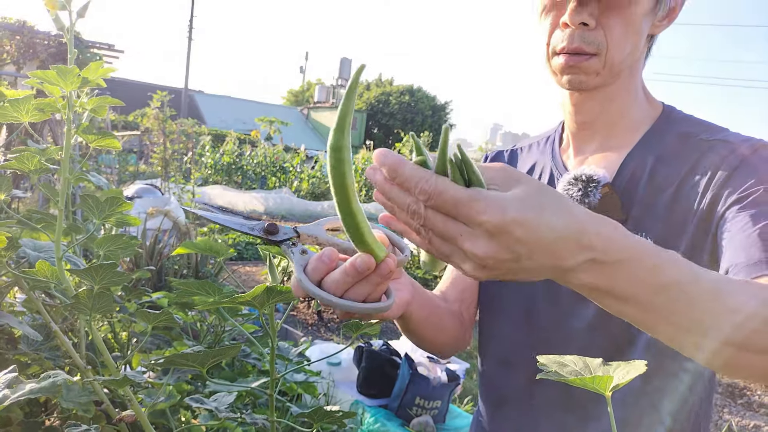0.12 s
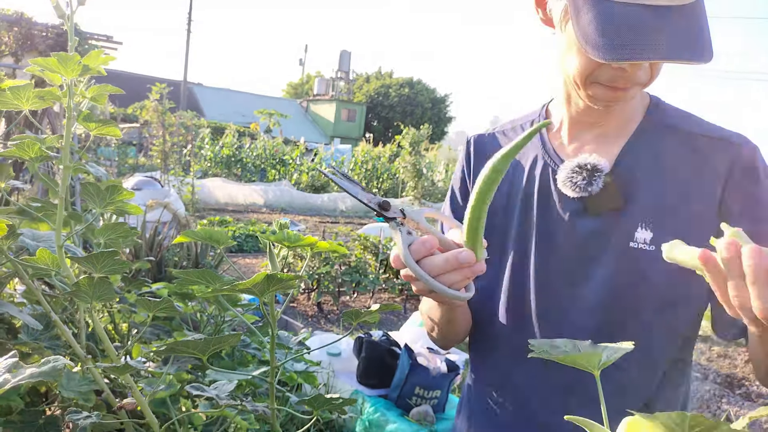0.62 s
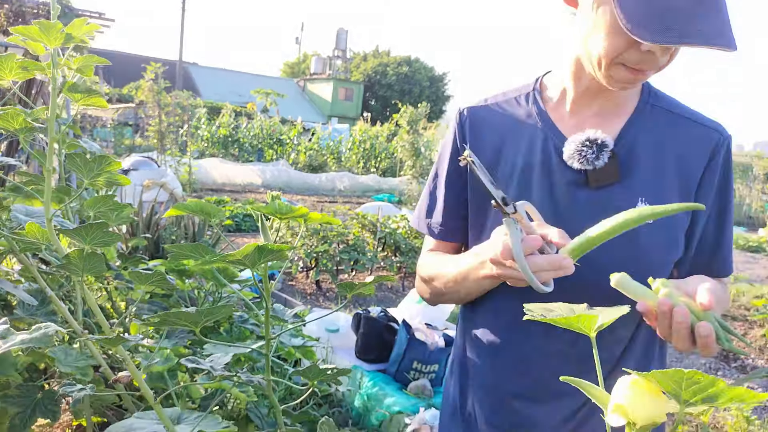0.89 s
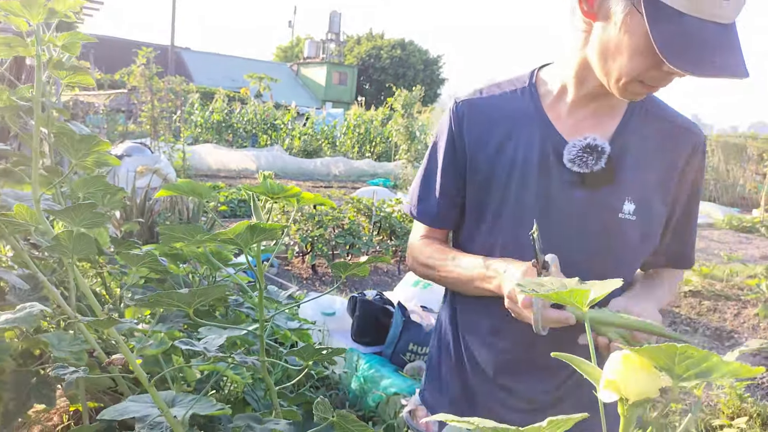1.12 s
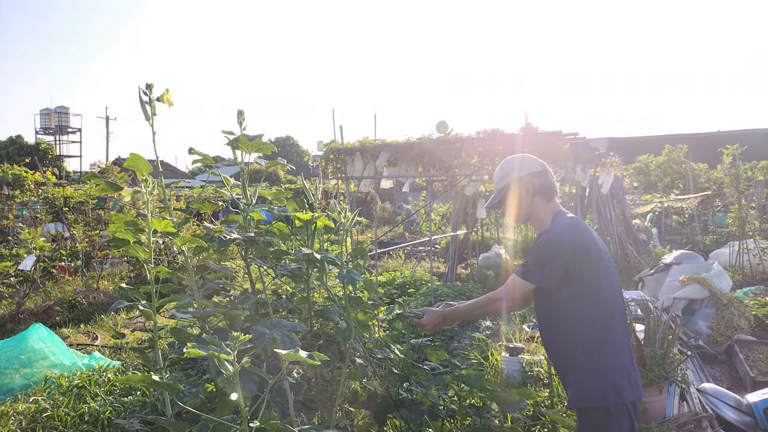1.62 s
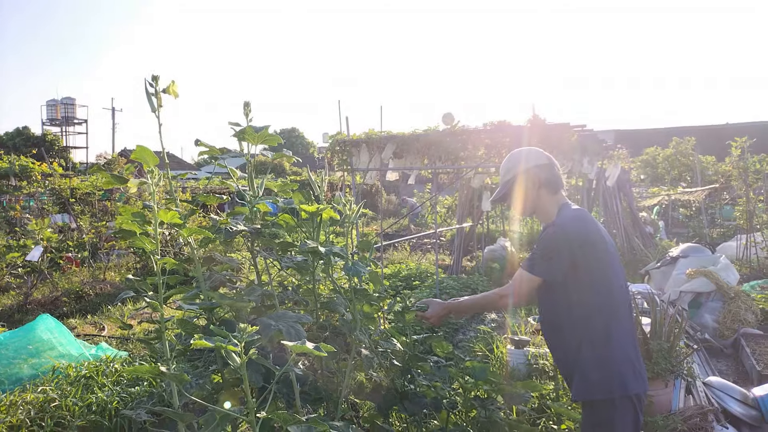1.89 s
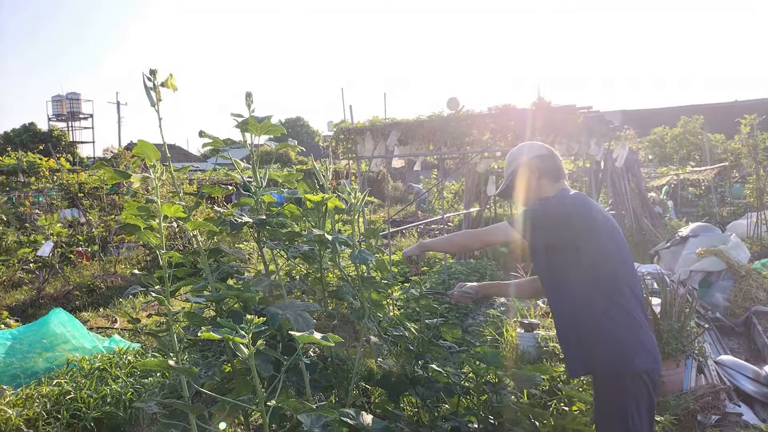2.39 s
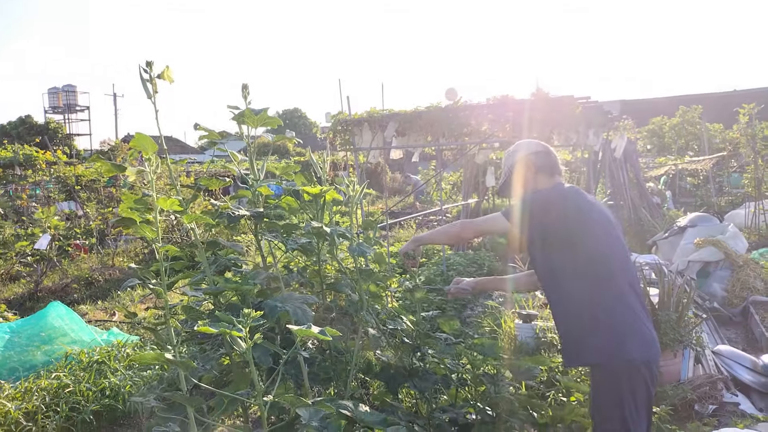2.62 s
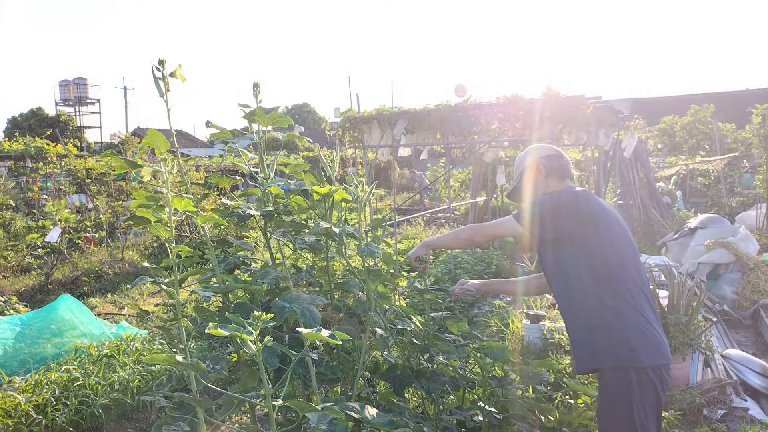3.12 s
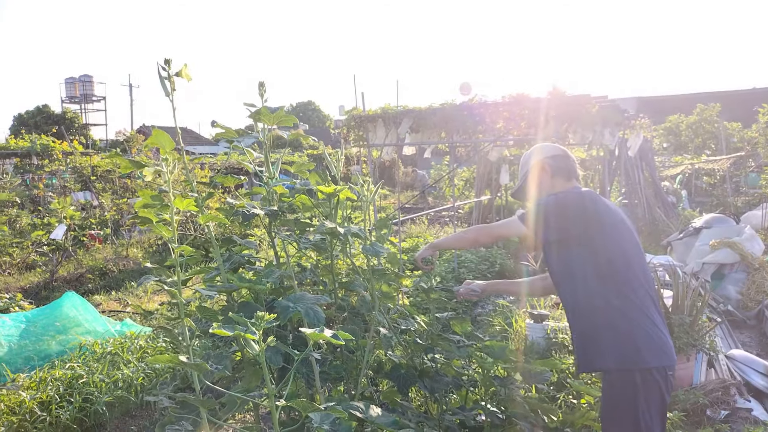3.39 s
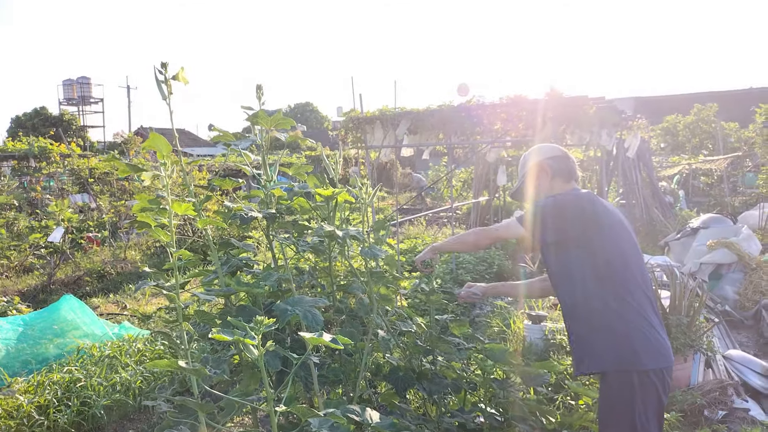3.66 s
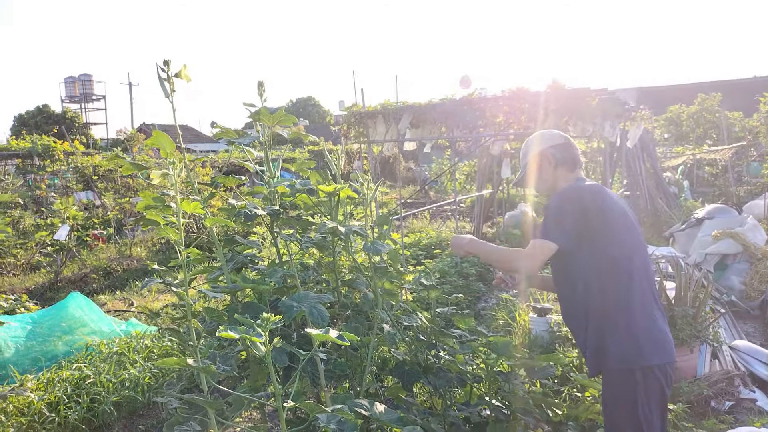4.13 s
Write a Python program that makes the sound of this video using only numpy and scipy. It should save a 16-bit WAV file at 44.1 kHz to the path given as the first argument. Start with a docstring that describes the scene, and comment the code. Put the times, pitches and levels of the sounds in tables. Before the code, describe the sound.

Two sharp metallic scissor snips cut tough stems close by in a garden while small birds twitter and a cricket chirps over faint traffic.

```python
"""Garden scissors cut two tough stalks close by: filtered noise bursts make fibres tick and blades snap,
with decaying sines for the ring of the steel and the grip. Soft knocks are short damped sines.
Small birds are gliding, trilling sines in scattered echoes; a cricket, bush insects, a far cricket chorus
and a far dove are shaped tones of unsteady pitch. Traffic hum, steady leaf hiss and a late cloth rustle
are coloured noise."""
import sys
import numpy as np
from scipy import signal
from scipy.fft import rfft, irfft, next_fast_len
from scipy.io import wavfile
from scipy.ndimage import uniform_filter1d, map_coordinates

SR = 44100
rng = np.random.default_rng(int(sys.argv[2]) if len(sys.argv) > 2 else 0)


def voltage_ratio(decibels):
    """Convert decibels (scalar or array-like) to amplitude ratios, 20 dB per decade."""
    exponent = np.asarray(decibels, float) / 20
    return 10 ** exponent


def master_out(mix):
    """Clip the mix to full scale and print it as 16-bit PCM to the path in sys.argv[1]."""
    frames = np.transpose(np.atleast_2d(mix))
    ceiling = np.clip(frames, -1, 1)
    pcm = np.round(ceiling * 32767).astype(np.int16)
    wavfile.write(sys.argv[1], SR, pcm)


N = 254809  # length in samples

# traffic and leaves over time: [t/s, traffic level/dB, leaves level/dB before a trim]
AIR_LEVELS = [(0, -48.5, -62), (1.33, -50, -64.5), (1.36, -52.5, -64.5), (3.9, -53, -64.5),
              (4.3, -54, -66.5), (5.3, -51.5, -60.5), (5.78, -46, -60.5)]
# spectrum of the far traffic: [f/Hz, relative level/dB]
TRAFFIC_SPECTRUM = [(13, -37.5), (22, -24.5), (64, -1), (118, 0.5), (251, -2.5), (544, -7.5), (825, -6),
                    (1280, -17.5), (2500, -28.5), (3250, -66), (5500, -120)]
# spectrum of the leaves: [f/Hz, relative level/dB]
LEAF_SPECTRUM = [(710, -27), (1200, -3.5), (1740, -11.5), (2500, -9), (3700, -13), (4440, -7),
                 (5720, -14.5), (6500, -13), (8310, -9), (10300, -13.5), (11000, -19.5), (11400, -41.5),
                 (13500, -44), (16000, -65.5)]
# scattering among stalks, leaves and sheds: [f/Hz, time to fall 60 dB/s]
GARDEN_DECAY = [(300, .04), (2500, .06), (5000, .14), (8000, .17), (12000, .12)]
# clear bird notes: [t/s, length/s, first f/Hz, last f/Hz, top level/dB]
WHISTLE_NOTES = [(0, 0.094, 3610, 3510, -53), (0.473, .03, 6100, 5100, -52.5),
                 (0.506, 0.026, 5200, 4090, -48), (0.516, 0.094, 4256, 4364, -43),
                 (0.624, 0.11, 3690, 3630, -61.5), (0.504, 0.041, 2310, 2050, -58.5),
                 (0.552, 0.044, 2190, 1760, -51), (.595, .04, 2270, 1600, -48),
                 (0.64, 0.041, 2210, 1690, -51), (0.746, 0.0457, 3260, 3200, -59),
                 (0.802, 0.029, 2900, 2500, -55.5), (0.832, 0.031, 3100, 3380, -49),
                 (.915, 0.037, 6700, 5660, -60), (1.34, 0.067, 5020, 5080, -51),
                 (1.343, 0.023, 3900, 4100, -50), (1.356, 0.021, 4500, 4680, -50),
                 (1.395, 0.026, 4530, 3310, -54.5), (1.368, 0.032, 3200, 3170, -59),
                 (1.413, 0.052, 3436, 2990, -44.5), (1.455, .022, 3050, 1940, -44.5),
                 (1.663, 0.025, 4900, 4880, -56), (1.714, 0.038, 4530, 4930, -47.5),
                 (2.265, 0.056, 5120, 3540, -57.5), (2.38, 0.021, 2280, 2360, -47.5),
                 (2.401, .02, 3040, 2890, -51.5), (2.426, 0.082, 2960, 3110, -43.5),
                 (2.479, 0.042, 6200, 6170, -71), (2.508, 0.025, 5050, 5060, -48),
                 (2.538, 0.026, 3420, 3390, -51.5), (2.564, 0.064, 3490, 3484, -40),
                 (2.583, .045, 7000, 6880, -52.5), (2.656, 0.025, 2800, 1990, -55),
                 (2.747, 0.046, 3500, 4030, -54), (2.743, 0.089, 5350, 6100, -55.5),
                 (2.825, 0.071, 2590, 2206, -54.5), (2.889, 0.1, 2240, 2140, -48),
                 (2.96, 0.047, 2250, 1795, -44.5), (2.998, 0.032, 3370, 2900, -61),
                 (3.031, 0.084, 2726, 2400, -47.5), (3.093, 0.033, 2473, 1780, -43),
                 (3.12, 0.062, 1777, 2370, -46.5), (3.36, 0.067, 2740, 2894, -52.5),
                 (3.528, 0.082, 1640, 1740, -58.5), (3.73, 0.019, 5850, 5950, -48),
                 (3.809, 0.11, 4240, 3940, -45), (3.896, 0.033, 4380, 1990, -46),
                 (3.924, 0.023, 1966, 1750, -52.5), (4.128, 0.032, 1913, 1860, -62),
                 (4.155, 0.027, 1515, 1580, -52.5), (4.191, 0.0388, 1714, 1680, -61.5),
                 (4.365, .022, 3910, 3850, -56), (4.386, 0.045, 2990, 2390, -59),
                 (4.454, .04, 3380, 3500, -58), (4.509, 0.056, 3350, 3660, -50.5),
                 (4.548, 0.024, 3300, 3080, -56), (4.527, 0.039, 1800, 1890, -52),
                 (4.65, .035, 3100, 3270, -56), (4.715, .03, 3380, 3370, -55),
                 (4.781, .04, 3050, 3100, -58.5), (4.833, 0.014, 2170, 2330, -48.5),
                 (4.852, 0.025, 2230, 2600, -47), (4.902, 0.045, 2490, 2230, -54),
                 (5.126, .025, 2500, 2250, -42.5), (5.148, 0.027, 2760, 2900, -48),
                 (1.115, 0.033, 1870, 1745, -63), (5.362, 0.04, 2794, 2910, -48.5),
                 (5.42, 0.029, 2952, 3100, -53), (5.482, .03, 2410, 2495, -47.5),
                 (5.501, 0.026, 3080, 3010, -42.5), (5.523, 0.033, 2860, 2740, -44),
                 (5.563, 0.038, 2920, 2586, -45.5), (5.57, 0.042, 2035, 1930, -48.5),
                 (5.603, 0.038, 2230, 2030, -41.5), (5.644, 0.039, 1966, 2150, -42.5),
                 (5.682, .03, 2073, 2100, -48)]
# guide level of the far flock: [t/s, level/dB]
FLOCK_LEVELS = [(0, -89), (.9, -57.5), (1.2, -77.5), (2.6, -72), (3.3, -72.5), (4, -73.5), (4.1, -58.5),
                (4.3, -71.5), (4.6, -56), (5.1, -64.5), (5.3, -72), (5.45, -55), (5.78, -62)]
# one row per insect source; the last, near 4450 Hz, is a far cricket chorus:
# [wing tones f/Hz, unsteadiness/Hz, stroke rate/Hz (0 = steady), stroke sharpness]
INSECT_WINGS = [((8800,), 50, 123.2, 1.1), ((7850, 7300), 70, 156, 1.3), ((9800, 9300), 70, 108, 1.3),
                ((6850,), 40, 0, 0), ((4450,), 90, 25, .8)]
# one list of bouts per insect source: [t/s, length/s, first level/dB, last level/dB]
INSECT_BOUTS = [
    [(1.345, 2.23, -66, -71.5), (3.53, 2.08, -78.5, -83.5)],
    [(3.5, 0.19, -69.5, -47), (3.86, .14, -64, -59), (4.14, 0.17, -67.5, -55.5), (4.46, 0.21, -66.5, -56),
     (4.84, 0.18, -69, -66)],
    [(5.221, 0.4, -64.5, -63.5)],
    [(1.1, 0.23, -74, -63), (2.63, 0.28, -70, -74), (4, 0.546, -74, -79)],
    [(0, 1.17, -70, -71), (1.28, 1.3, -70.5, -77.5), (2.19, 0.21, -66, -69), (2.4, 0.94, -78, -74),
     (3.22, 0.85, -75, -66), (4.13, 0.72, -89, -85), (4.92, 0.24, -62.5, -56), (5.33, .5, -86, -67)],
]
# bouts of cricket chirps: [first t/s, last t/s, last chirp's level/dB before scatter, f/Hz]
CRICKET_BOUTS = [(.059, 0.287, -31, 4445), (0.396, .46, -51, 4560), (.754, 0.991, -32.5, 4237),
                 (1.213, 1.302, -57, 4480), (1.485, 1.537, -54.5, 4460), (2.215, 2.342, -50.5, 4235),
                 (2.633, 2.716, -54.5, 4280), (3.586, 3.707, -53, 4250), (3.962, 4.11, -55, 4360),
                 (4.556, 4.75, -53.5, 4460), (5, 5.135, -48, 4350), (5.459, 5.584, -52.5, 4600),
                 (5.631, 5.745, -48.5, 4550)]
# tearing fibres and stems: [t/s, level/dB before a trim, loudest f/Hz, its boost/dB]
FIBRE_TICKS = [(0.1323, -33, 5000, 19), (0.4234, -44, 6880, 14), (1.8, -25, 7140, 1),
               (1.803, -30.5, 7000, 0), (1.81, -23.5, 6750, 6), (1.8259, -31, 7900, 1),
               (1.835, -22.5, 7000, -3), (1.8405, -28, 5000, -1), (1.8447, -25.5, 6000, 0),
               (1.847, -17, 7390, 13), (3.7589, -15.5, 3220, 9.5), (3.769, -30, 3200, 6),
               (3.785, -29, 3480, -1), (3.7879, -8, 3046, 6), (3.802, -16, 5940, 6), (3.989, -44, 5500, 10),
               (4.932, -44, 3430, 18.5), (5.047, -17, 2320, 33), (5.0897, -19, 2580, 41)]
# blades snapping shut: [t/s, level/dB before a trim, loudest f/Hz, its boost/dB]
BLADE_SNAPS = [(1.8508, 1.5, 3200, -8.5), (3.7934, 2.5, 8340, -5)]
# spectrum under every cutting contact: [f/Hz, relative level/dB]
CRACK_SPECTRUM = [(120, -49), (250, -26.5), (700, -19), (1200, -11), (2250, -12), (3460, -10), (5070, -1),
                  (7070, 0.5), (9210, -0.5), (10300, -10), (11200, -26), (15500, -25.5), (16200, -60)]
# ringing modes of the blades: [f/Hz, relative level/dB, time to fall 60 dB/s]
STEEL_MODES = [(5900, -7, 0.092), (6350, -9, 0.18), (6890, -8, 0.17), (6830, -2, 0.17), (7287, 0, 0.1),
               (8340, -9.5, 0.18), (8700, -14, 0.1), (8500, -5.5, 0.098), (9889, -14.5, 0.27),
               (10700, -11.5, 0.11)]
# buzzy falling calls: [t/s, length/s, first f/Hz, last f/Hz, top level/dB]
BUZZ_CALLS = [(0.209, 0.062, 6370, 5510, -51.5), (0.756, 0.065, 6100, 5340, -61.5),
              (0.835, 0.085, 6460, 5260, -56), (1.904, .078, 3380, 2980, -43.5),
              (2.001, 0.1912, 6410, 3950, -51.5), (2.812, .23, 5620, 4110, -54),
              (3.152, 0.083, 6440, 4060, -55), (3.466, .09, 6580, 4550, -62)]
# strings of arched syllables: [t/s, length/s, starting f/Hz, top level/dB before the swing, syllable rate/Hz]
WARBLE_STRINGS = [(.91, .132, 3150, -50, 52), (.935, .122, 2330, -53, 52), (1.06, .06, 2600, -58, 60),
                  (1.3, .045, 5000, -60, 70), (1.568, .08, 2230, -53, 50), (1.752, .097, 3120, -41, 50),
                  (4.05, .1, 2050, -62, 50), (4.565, .045, 2100, -42, 90), (4.6, .03, 2500, -48, 70),
                  (4.625, .2, 2330, -45, 45)]
# soft knocks of hands and pods: [t/s, starting level/dB before the soft onset, f/Hz]
KNOCKS = [(1.241, -36, 1126), (1.286, -39, 149), (3.354, -34.5, 252), (5.243, -31, 1040),
          (5.4, -40.5, 1140), (5.6, -35, 800), (5.646, -31.5, 1133), (5.678, -26, 321.6), (5.721, -43, 199)]
# coos of the far dove: [t/s, length/s, first level/dB, last level/dB]
DOVE_COOS = [(1.36, 0.089, -45, -50.5), (1.48, 0.091, -50, -58), (1.565, 0.047, -49, -48)]
# blows that reach the grip: [t/s, level/dB added to each mode, favoured f/Hz]
GRIP_BLOWS = [(1.8512, -18, 1100), (3.7592, -30, 1514), (3.788, -25, 1396), (3.7935, -12.5, 2280)]
# ringing modes of the grip: [f/Hz, relative level/dB, time to fall 60 dB/s]
GRIP_MODES = [(800, -4.5, 0.034), (1280, 0, 0.016), (1514, -2.5, 0.049), (2280, -0.5, 0.022),
              (266, -3, 0.026)]
# dry bird rattles: [t/s, length/s, first f/Hz, last f/Hz, top level/dB before the swing]
RATTLE_CALLS = [(2.704, .062, 2400, 2326, -49), (2.763, 0.066, 2210, 2400, -52.5),
                (5.024, 0.052, 2290, 2166, -48.5), (5.078, 0.041, 2300, 2280, -52.5)]
# a sleeve brushing the plant: [t/s, level/dB before flutter]
RUSTLE_LEVELS = [(5.55, -87), (5.66, -72), (5.72, -61), (5.75, -48), (5.78, -47.5)]
# spectrum of the sleeve: [f/Hz, relative level/dB]
CLOTH_SPECTRUM = [(100, -18), (300, -3.5), (1200, -10.5), (3000, -4.5), (9000, -22.0), (12000, -41.5)]


def unit(x):
    """Scales a signal to rms 1."""
    return x / np.sqrt(np.mean(x ** 2) + 1e-20)


def along(points, hz):
    """Reads (Hz, value) points on a log frequency axis."""
    f, v = np.transpose(points)
    return np.interp(np.log(hz + 1), np.log(f + 1), v)


def curves(rows):
    """Gives one value per sample for each column after the time."""
    s, *columns = np.transpose(rows)
    return [np.interp(np.arange(N) / SR, s, column) for column in columns]


def wobble(rate, size=N):
    """A smooth random curve with rate knots a second."""
    knots = rng.standard_normal(int(size * rate / SR) + 4)
    return map_coordinates(knots, [np.arange(size) * rate / SR])


def coloured(gain, size=N):
    """Noise of rms 1 with the given gain over frequency."""
    m = next_fast_len(size + 4096)
    spectrum = rfft(rng.standard_normal(m)) * gain(np.fft.rfftfreq(m, 1 / SR))
    return unit(irfft(spectrum, m)[:size])


def shaped(spectrum):
    """Full-length noise of rms 1 with a tabled spectrum."""
    return coloured(lambda f: voltage_ratio(along(spectrum, f)))


def add(track, s, sound):
    """Mixes a sound in at time s."""
    part = track[max(round(s * SR), 0):][:len(sound)]
    part += sound[:len(part)]


def tone(hz):
    """A sine that follows a pitch curve by summing its phase."""
    return np.sin(2 * np.pi * np.cumsum(hz) / SR)


def modes(rows, t):
    """A struck body: a sum of sines, each dying at its own speed."""
    return sum(voltage_ratio(db - 60 * t / t60) * np.sin(2 * np.pi * hz * t) for hz, db, t60 in rows)


def bouts(rows, edge_s):
    """A gain that opens, slides from first to last level and closes, for each row."""
    t = np.arange(N) / SR
    gain = np.zeros(N)
    for s, length, *db in rows:
        gate = np.clip(np.minimum(t - s, s + length - t) / edge_s, 0, 1)
        gain += voltage_ratio(np.interp(t, [s, s + length], db)) * gate
    return gain


def echoes(x):
    """Stalks, leaves and sheds scatter the sound: a noise tail whose frequencies die at their own speeds."""
    hz, t, z = signal.stft(rng.standard_normal(SR // 3), SR, nperseg=128)
    decay = voltage_ratio(-60 * t / along(GARDEN_DECAY, hz)[:, None])
    tail = signal.istft(z * decay, SR, nperseg=128)[1]
    return signal.fftconvolve(x, tail / np.linalg.norm(tail))[:len(x)]


def traffic():
    """Distant traffic blends into low noise with a slow sway in level."""
    level_db = curves(AIR_LEVELS)[0]
    return voltage_ratio(level_db + .8 * wobble(4)) * shaped(TRAFFIC_SPECTRUM)


def leaves(streak_db=2.8, trim_db=-0.5):
    """Hiss whose level varies in long narrow streaks over time and frequency."""
    z = signal.stft(shaped(LEAF_SPECTRUM), nperseg=512)[2]
    streaks = uniform_filter1d(rng.standard_normal(z.shape), size=2, axis=0)
    streaks = uniform_filter1d(streaks, size=24, axis=1)
    hiss = signal.istft(z * voltage_ratio(streak_db * unit(streaks)), nperseg=512)[1][:N]
    return voltage_ratio(curves(AIR_LEVELS)[1] + trim_db) * unit(hiss)


def sing(length, first_hz, last_hz, db, drift, flutter_db, bend=1, trill=(0, 0, 0), loose=0, fade_db=10.5):
    """A bird's voice: a sine that glides, swells and fades, with trill, unsteady pitch and fluttering breath."""
    t = np.arange(0, length, 1 / SR)
    u, size = t / length, len(t)
    rate, share, swing_db = trill  # Hz, pitch swing as a share, level swing in dB
    swing = -np.cos(2 * np.pi * (rate * t + loose * wobble(50, size)))
    glide = first_hz + (last_hz - first_hz) * u ** bend
    pitch = glide * (1 + share * swing * glide / first_hz + drift * wobble(90, size))
    top_at = 0.69  # where the top lies in the note; its ends lie fade_db below
    swell_db = -fade_db * ((u - top_at) / np.where(u < top_at, top_at, 1 - top_at)) ** 2
    breath_db = flutter_db * (wobble(110, size) + .5 * wobble(300, size))
    edges = np.clip(np.minimum(t, length - t) / 0.0022, 0, 1)
    level = voltage_ratio(db + swell_db + swing_db * swing + breath_db)
    return np.sqrt(2) * edges * level * tone(pitch)


def whistlers():
    """Whistling birds in the hedges hold nearly pure gliding notes."""
    out = np.zeros(N)
    for s, *note in WHISTLE_NOTES:
        add(out, s, sing(*note, drift=.014, flutter_db=3))
    return out


def flock():
    """A far flock twitters: 600 short notes at random times and pitches."""
    out, flock_db = np.zeros(N), curves(FLOCK_LEVELS)[0]
    for when, high, glide, span in rng.random((600, 4)):
        s = when * (N - 1) / SR
        hz = 1700 * 2.6 ** high
        last_hz = hz * (.9 + .2 * glide)
        db = flock_db[int(s * SR)] - 5 - 6 * glide * span
        add(out, s, sing(.012 + .03 * span, hz, last_hz, db, drift=.05, flutter_db=4, fade_db=4))
    return out


def insects():
    """Bush insects and a far cricket chorus: tones of unsteady pitch, pulsed by regular strokes or steady."""
    out, t = np.zeros(N), np.arange(N) / SR
    for (wings, spread_hz, rate, sharp), rows in zip(INSECT_WINGS, INSECT_BOUTS):
        phase = 2 * np.pi * rate * t + 0.88 * wobble(4.2)
        strokes = np.exp(sharp * np.cos(phase)) * voltage_ratio(1.8 * wobble(60))
        ring = sum(tone(hz + spread_hz * wobble(150)) for hz in wings)
        out += bouts(rows, edge_s=0.032) * unit(strokes * ring)
    return out


def cricket(rise_s=0.0086, fall_s=0.0022, sag=.04, lead_db=-13):
    """Each wing stroke scrapes softly, swells, sags in pitch and stops short."""
    gap_s, swell_db, scatter_db = .04, 0.45, 3  # swell: dB per (chirps to go) squared
    out, t = np.zeros(N), np.arange(-.03, .02, 1 / SR)
    shape = np.exp(-(t / np.where(t < 0, rise_s, fall_s)) ** 2)
    lead = voltage_ratio(lead_db) * np.sin(np.pi * np.clip(-t / 0.05, 0, 1))
    for first, last, top_db, hz in CRICKET_BOUTS:
        times = np.linspace(last, first, round((last - first) / gap_s) + 1)
        for to_go, s in enumerate(times):
            db = top_db - swell_db * to_go ** 2 + scatter_db * rng.standard_normal()
            pitch = hz * (1 - sag * t / .03 + .02 * wobble(150, len(t)))
            scrape = lead * wobble(309, len(t))
            add(out, s - .03, voltage_ratio(db) * (shape + scrape) * tone(pitch))
    return out


def cuts(ring_db=-36, wet_db=-17, trim_db=-6.5):
    """Fibres tick and blades snap: each contact is a noise burst that rings the steel and wakes echoes."""
    out, t = np.zeros(N), np.arange(SR // 3) / SR
    # each contact gains a hold time and a time to fall 60 dB, both in seconds
    contacts = [(*row, .0047, .013) for row in BLADE_SNAPS]
    contacts += [(*row, 0.00089, 0.012) for row in FIBRE_TICKS]
    for s, db, hz, boost_db, hold, t60 in contacts:
        def colour(f):
            peak = 1 / (1 + ((f - hz) / (.2 * hz)) ** 2) ** 2
            return voltage_ratio(along(CRACK_SPECTRUM, f)) + voltage_ratio(boost_db) * peak
        envelope = voltage_ratio(-60 * np.maximum(t - hold, 0) / t60) * (1 - np.exp(-t / 0.00053))
        burst = coloured(colour, len(t)) * envelope
        ring = modes([(f, level + rng.normal(0, 3), life) for f, level, life in STEEL_MODES], t)
        contact = burst + voltage_ratio(wet_db) * echoes(burst) + voltage_ratio(ring_db - boost_db) * ring
        add(out, s, voltage_ratio(db + trim_db) * contact)
    return out


def buzzy_callers():
    """Buzzy bird calls fall fast at first while a quick trill shakes the pitch."""
    out = np.zeros(N)
    for s, *note in BUZZ_CALLS:
        add(out, s, sing(*note, drift=.01, flutter_db=3, bend=.5, trill=(87.6, .055, 0), loose=.1, fade_db=6))
    return out


def warblers():
    """Warbling birds arch pitch and level together in each syllable as the whole string sags."""
    out, sag_hz_per_s = np.zeros(N), 1100
    for s, length, hz, db, rate in WARBLE_STRINGS:
        last_hz = hz - sag_hz_per_s * length
        add(out, s, sing(length, hz, last_hz, db, drift=.018, flutter_db=3,
                         trill=(rate, .075, 6), loose=.05, fade_db=6))
    return out


def bumps(cycles=9):
    """Hands and pods knock softly: a few damped cycles with a rounded start."""
    out, t = np.zeros(N), np.arange(SR // 8) / SR
    for s, db, hz in KNOCKS:
        t60 = 0.037 + cycles / hz
        add(out, s, (1 - np.exp(-t / 0.0051)) * modes([(hz, db, t60)], t))
    return out


def dove():
    """A far dove gives soft low coos: one sine near 478 Hz with a slight waver."""
    return bouts(DOVE_COOS, edge_s=.025) * tone(478 + 5 * wobble(15))


def grip():
    """Blows ring the grip, waking the modes near their favoured pitch most."""
    out, t = np.zeros(N), np.arange(SR // 3) / SR
    for s, blow_db, near_hz in GRIP_BLOWS:
        woken = []
        for hz, db, t60 in GRIP_MODES:
            off_db = 12.5 * min(abs(np.log2(hz / near_hz)), 1)  # dB per octave, up to one octave
            woken.append((hz, db + blow_db - off_db, t60))
        add(out, s, modes(woken, t))
    return out


def rattlers():
    """Dry bird rattles: a fast loose trill roughens pitch and level."""
    out = np.zeros(N)
    for s, *note in RATTLE_CALLS:
        add(out, s, sing(*note, drift=.045, flutter_db=5, trill=(159.7, .1, 4), loose=.25, fade_db=7))
    return out


def cloth():
    """A sleeve brushes the plant: fluttering noise that rises at the end."""
    return voltage_ratio(curves(RUSTLE_LEVELS)[0] + 8.6 * wobble(40)) * shaped(CLOTH_SPECTRUM)


def scene():
    """Near scissors and knocks; birds and cricket farther off, in echoes; insects, dove and air around."""
    singers = whistlers() + flock() + cricket() + buzzy_callers() + warblers() + rattlers()
    far = singers + voltage_ratio(-7) * echoes(singers)
    near = cuts() + grip() + bumps()
    air = traffic() + leaves() + cloth()
    return (near + far + insects() + dove() + air)[None]


def low_pass(x):
    """Removes everything above the highest recorded frequency."""
    return signal.sosfilt(signal.butter(12, 15830, fs=SR, output="sos"), x)


def record(dry):
    """The snaps clip the recorder: peaks bend smoothly towards a ceiling."""
    ceiling = 0.98
    clipped = dry / (1 + np.abs(dry / ceiling) ** 8) ** (1 / 8)
    return low_pass(clipped)


dry = scene()
out = record(dry)
master_out(out)
```